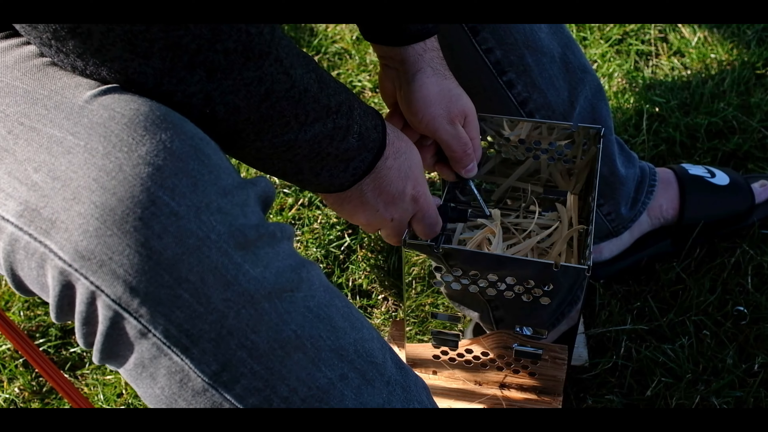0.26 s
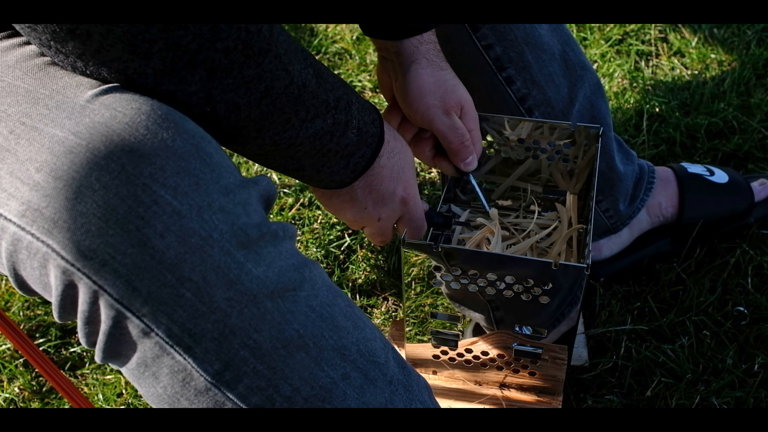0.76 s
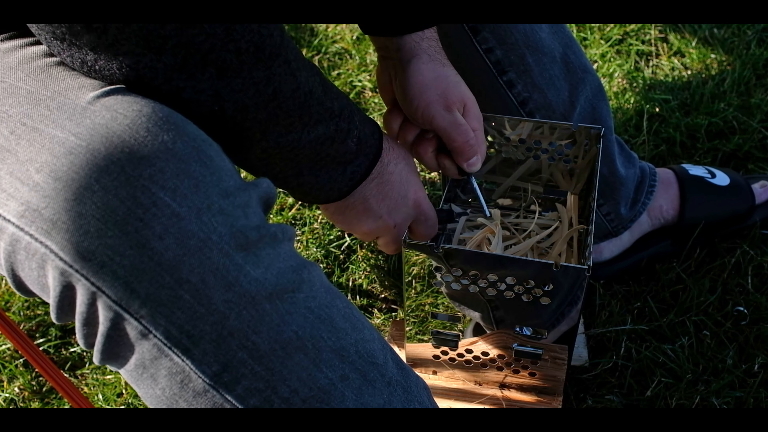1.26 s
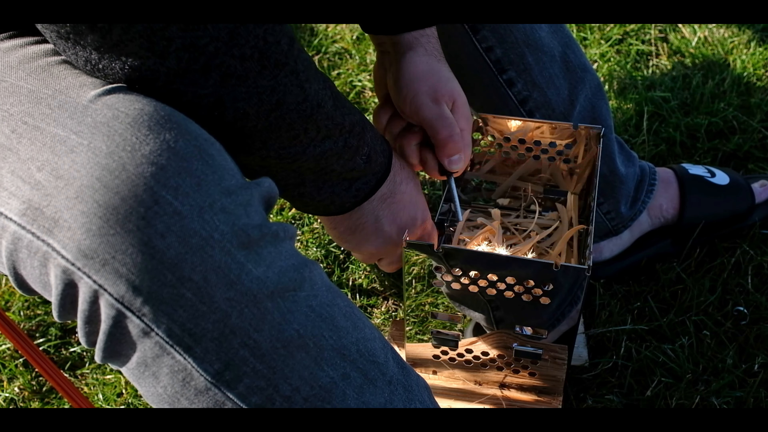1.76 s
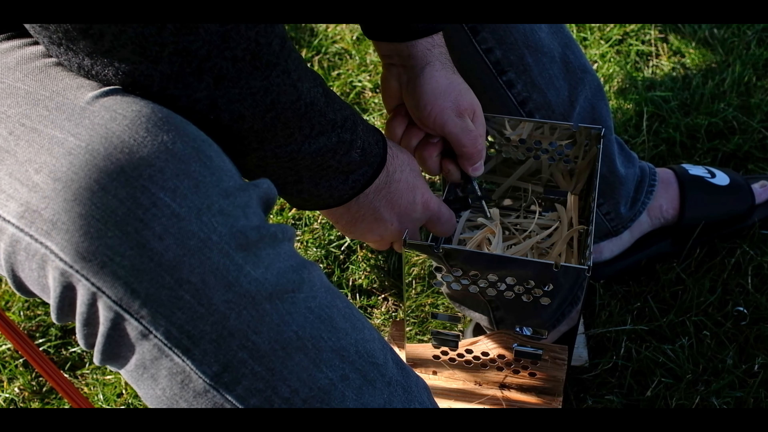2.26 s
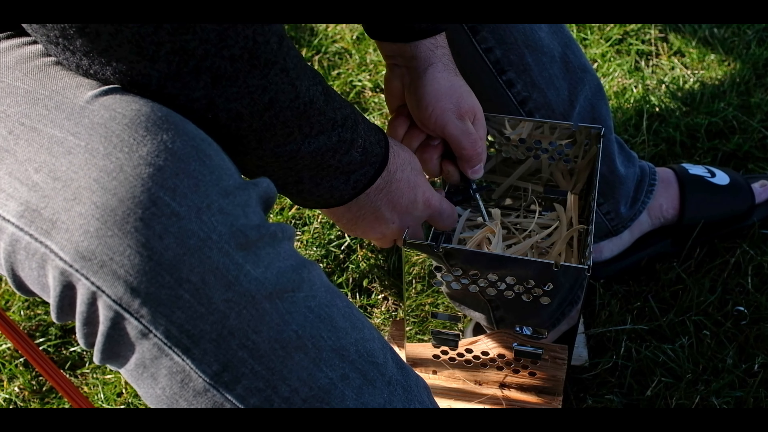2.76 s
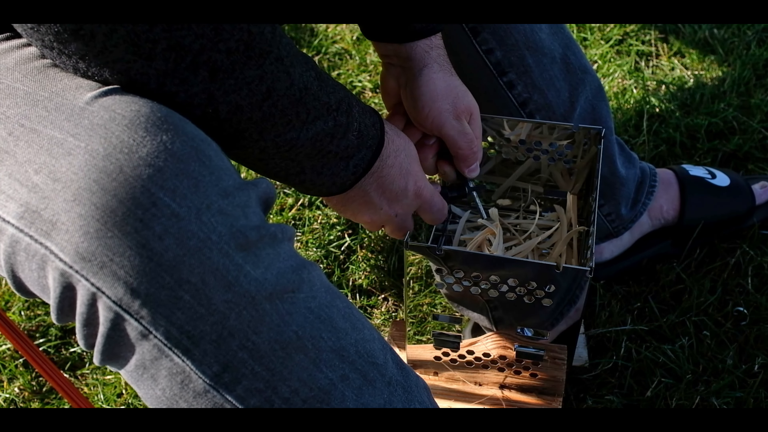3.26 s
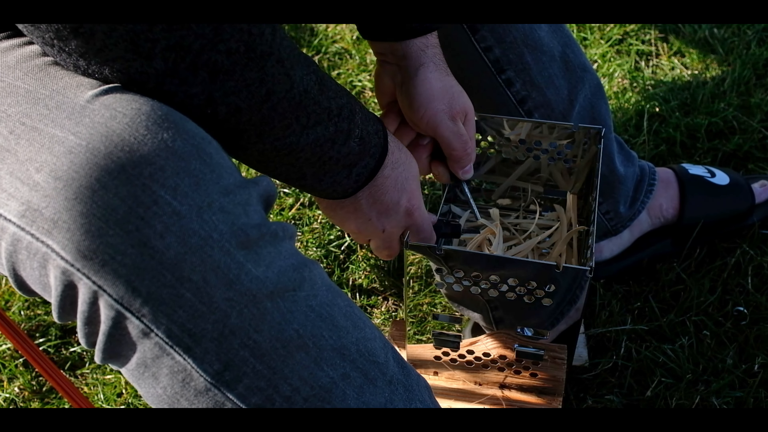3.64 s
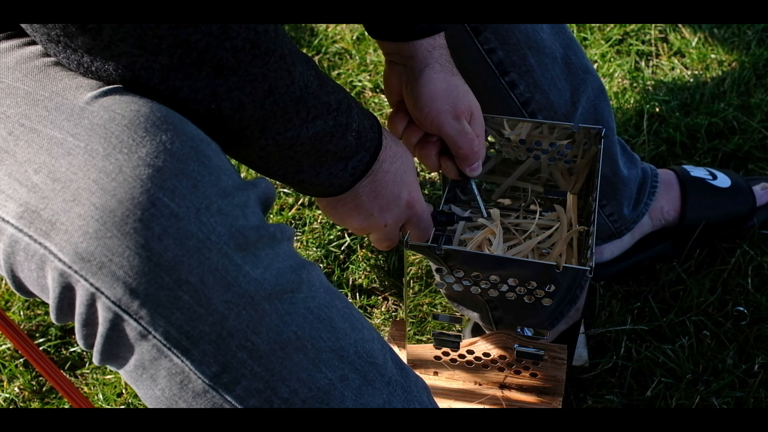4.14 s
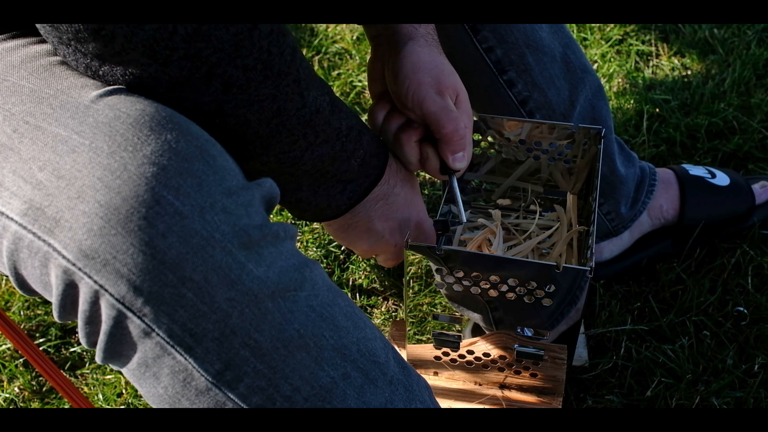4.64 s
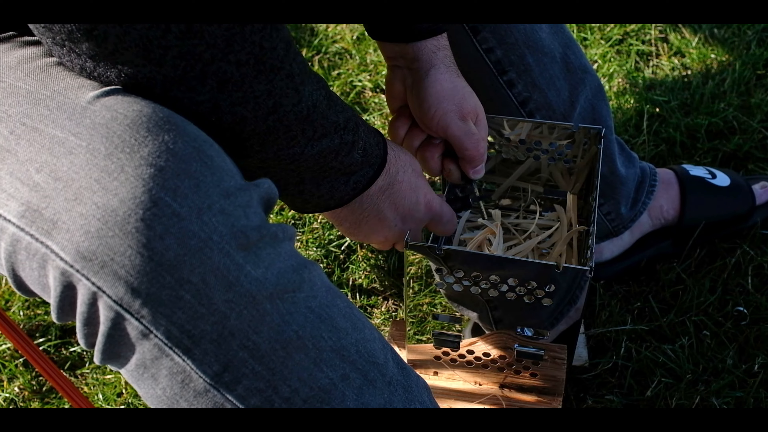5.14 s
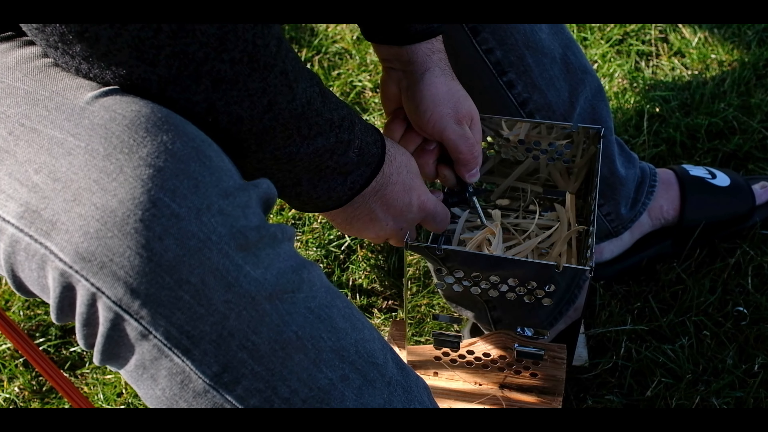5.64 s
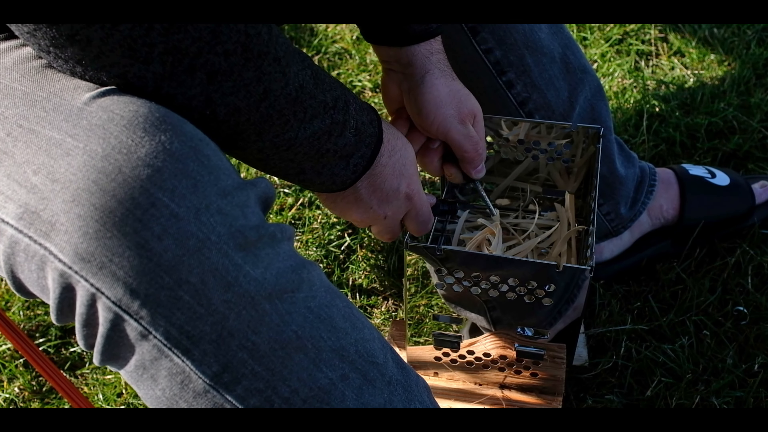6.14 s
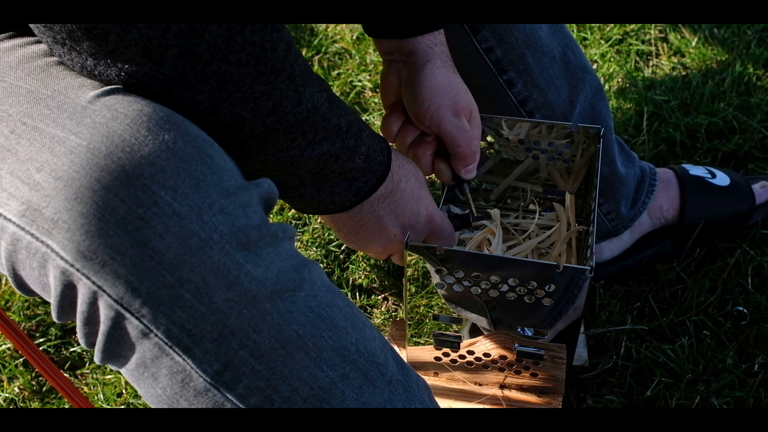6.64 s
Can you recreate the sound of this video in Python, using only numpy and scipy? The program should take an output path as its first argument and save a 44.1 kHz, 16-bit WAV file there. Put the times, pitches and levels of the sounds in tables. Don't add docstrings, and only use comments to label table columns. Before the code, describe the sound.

A steel striker rasps down a fire-steel rod in a dozen sharp, sizzling strokes with metallic ticks between, over booming wind buffeting a bare microphone.

```python
import sys
import numpy as np
from scipy import signal
from scipy.fft import rfft, irfft, next_fast_len
from scipy.io import wavfile
from scipy.ndimage import uniform_filter1d

SR = 44100
rng = np.random.default_rng(int(sys.argv[2]) if len(sys.argv) > 2 else 0)


def master_out(mix):
    frames = np.transpose(np.atleast_2d(mix))
    ceiling = np.clip(frames, -1, 1)
    pcm = np.round(ceiling * 32767).astype(np.int16)
    wavfile.write(sys.argv[1], SR, pcm)


def invert_db(x):
    u = np.asarray(x, float) / 20
    return 10 ** u


N = 304290
SCENE_CHANGE_S = 6.752


def unit(x):
    return x / np.sqrt(np.mean(x ** 2))


def curve(table, outside=-120.):
    s, *columns = np.transpose(table)
    t = np.arange(N) / SR
    return np.array([np.interp(t, s, column, outside, outside) for column in columns])


def walk(rate):
    hold = int(SR / rate)
    steps = np.repeat(rng.standard_normal(N // hold + 1), hold)
    return unit(uniform_filter1d(uniform_filter1d(steps, hold), hold)[:N])


def resonate(x, modes, shift_db=0., rate=60):
    filters = []
    for k, (hz, width, db) in enumerate(modes):
        gain = invert_db(db) * (-1) ** k
        filters.append((gain, signal.iirpeak(hz, hz / width, SR)))
    impulse = signal.unit_impulse(4096)
    norm = np.linalg.norm(sum(g * signal.lfilter(*f, impulse) for g, f in filters))
    return sum(g * signal.lfilter(*f, x * invert_db(shift_db * walk(rate))) for g, f in filters) / norm


def coloured(spectrum, flicker_db, rate):
    hz, db = np.transpose(spectrum)
    size = next_fast_len(N)
    place = np.log2(np.maximum(np.arange(size // 2 + 1) * SR / size, 1))
    tone = rfft(rng.standard_normal(size)) * invert_db(np.interp(place, np.log2(hz), db))
    total = 0
    for octave in range(16):
        band = irfft(tone * np.maximum(1 - abs(place - octave), 0), size)[:N]
        total = total + invert_db(flicker_db * walk(rate)) * band
    return unit(total)


def grit(per_s, spread_db, hiss, patchy_db, rate):
    signs = (rng.random(N) < per_s / SR) * rng.choice([-1, 1], N)
    clicks = signs * invert_db(spread_db * np.minimum(rng.exponential(size=N), 4))
    return unit((unit(clicks) + hiss * rng.standard_normal(N)) * invert_db(patchy_db * walk(rate)))


# f/Hz, level/dB per Hz
BUFFET_SPECTRUM = [(2.4, -38.5), (4.0, 2), (16, 2.5), (30, 2.5), (63, -15.5), (101, -24.5), (123, -52.5),
                   (160, -41), (210, -53.5), (350, -120)]
# t/s, pressure/full scale, length/s
OVERLOAD_SLAMS = [
    (0.15, -1.08, 0.022),
    (0.353, 1.12, 0.019),
    (0.5845, -1.194, 0.02),
    (2.13, 1.04, 0.023),
]


def buffets(gust_db):
    eddies = coloured(BUFFET_SPECTRUM, flicker_db=0.0, rate=2)
    eddies /= uniform_filter1d(eddies ** 2, int(.07 * SR)) ** .28
    level_db = 11.5 + 0.97 * gust_db + 1.8 * walk(7)
    pressure = .95 * np.tanh(invert_db(level_db) * unit(eddies) / .95)
    t = np.arange(N) / SR
    for s, peak, length in OVERLOAD_SLAMS:
        near = np.exp(-((t - s) / length) ** 2 * 2)
        pressure += near * (peak * np.cos(np.pi * (t - s) / length) - pressure)
    return pressure


# f/Hz, level/dB per Hz
RUSH_SPECTRUM = [(41, -21.5), (70, -8.5), (209, -21), (391, -27.5), (428, -30), (613, -36.5), (989, -42),
                 (2500, -64), (3250, -96), (5500, -120)]


def rush(gust_db):
    far = np.arange(N) / SR > SCENE_CHANGE_S
    level_db = -17.5 + 0.7 * gust_db - 15 * far
    return invert_db(level_db) * coloured(RUSH_SPECTRUM, flicker_db=1.0, rate=12)


# t/s, f/Hz, level/dB
WHISTLE_PATH = [(0, 948, -82), (1.3, 780, -86), (1.8, 950, -56.5), (1.95, 1004, -54.5), (2.1, 900, -54.5),
                (2.3, 900, -65), (2.7, 809, -58), (3.2, 785, -61), (5.8, 902, -79.5), (6.2, 1051, -58.5),
                (6.5, 982, -57.5), (6.75, 917, -54), (6.9, 943, -67.5)]


def whistle():
    hz, db = curve(WHISTLE_PATH)
    wobble = signal.lfilter(*signal.butter(2, 38, fs=SR), rng.standard_normal((2, N)))
    phase = 2 * np.pi * np.cumsum(hz * (1 + .065 * walk(16))) / SR
    return invert_db(db) * unit(wobble[0] * np.cos(phase) + wobble[1] * np.sin(phase))


def grass():
    hiss = resonate(rng.standard_normal(N), [(6250, 420, 0)])
    return invert_db(-78.5 + 3.0 * walk(4.6)) * hiss


# f/Hz, level/dB per Hz
AIR_SPECTRUM = [(880, -16.5), (1500, -6), (1610, -10.5), (1870, -8.5), (1920, -12.5), (5600, -21),
                (6310, -20.5), (7760, -24), (15100, -33), (16000, -38.5)]


def air():
    return invert_db(-61) * coloured(AIR_SPECTRUM, flicker_db=3.1, rate=16)


# t/s, level/dB
GUSTS = [(0, -17.5), (.35, -20.5), (.62, -23.5), (1.0, -29.5), (1.3, -27), (1.7, -27), (2.1, -23),
         (2.5, -26.5), (2.75, -26.5), (3.3, -27), (3.6, -30.5), (4.4, -31), (5.0, -35.5), (5.7, -33),
         (6.15, -24), (6.45, -22.5), (6.75, -28), (6.9, -33)]


def wind():
    gust_db, = curve(GUSTS, outside=-30.0)
    return buffets(gust_db) + rush(gust_db) + whistle() + grass() + air()


# t/s, length/s, first chatter level/dB, last chatter level/dB, rise of sizzle level/dB
SKATES = [(0, 0.015, -68, -27.5, 10), (0.546, .069, -43, -30, 11), (1.144, .05, -46.5, -30.5, 12.5),
          (1.722, .054, -50, -28.5, 10.5), (2.278, 0.034, -34.5, -39.5, 4), (2.826, .037, -41, -29.5, 12),
          (3.399, .048, -49, -28.5, 16), (3.995, 0.035, -33.5, -37.5, 6), (4.558, 0.066, -48, -30, 11),
          (5.158, 0.043, -50.5, -36, 17), (5.749, 0.056, -53, -31.5, 7.5), (6.035, .018, -59, -37.5, -2),
          (6.573, .11, -53, -47.5, 13)]
# t/s, hold/s, sizzle level/dB, 30 dB fade/s, box minus sizzle level/dB
SHAVING_CUTS = [(.014, 0.0021, -31, 0.0427, -7.5), (.617, 0.01, -23, 0.0917, -1.5),
                (1.193, 0.01, -29, 0.0776, -6), (1.773, .03, -31.5, 0.0811, -6),
                (2.305, 0.016, -27, 0.0479, -10), (2.865, 0.056, -21.5, 0.0765, -2.5),
                (3.447, 0.028, -28, 0.0415, -7.5), (4.03, .03, -28, 0.0505, -10),
                (4.622, 0.028, -30.5, 0.0252, -6.5), (5.203, 0.013, -29.5, 0.0614, -6),
                (5.228, 0.043, -24.5, 0.0725, -1.5), (5.803, 0.044, -30.5, 0.0547, -2.5),
                (6.684, 0.01, -46, 0.1, -9)]
# t/s, hold/s, level/dB, 30 dB fade/s, box minus drag
# level/dB
DULL_DRAGS = [(.04, 0.11, -57, .05, -4), (.733, 0.033, -30, 0.082, 0.5), (1.375, .03, -56, 0.19, -6),
              (1.845, 0.019, -41, 0.028, -13), (2.36, 0.08, -54.5, 0.23, -2), (3.54, 0.07, -61, 0.032, 8),
              (3.6, .05, -63.5, 0.017, 13.5), (4.922, 0.053, -53.5, 0.024, 9),
              (5.855, 0.026, -31.5, 0.07, -1)]


def contact():
    levels, t = np.zeros((3, N)), np.arange(N) / SR
    for s, length, from_db, to_db, bite_db in SKATES:
        on = slice(int(s * SR), int((s + length) * SR))
        progress = np.clip((t[on] - s) / length, 0, 1)
        rod_db = from_db + (to_db - from_db) * progress
        sizzle_db = rod_db - 8 + bite_db * progress ** 3.3
        levels[:, on] += invert_db([sizzle_db, rod_db, rod_db - 10])
    # strokes, chatter dB, chatter sag dB/s, rise s
    for strokes, chatter_db, chatter_sag, rise in [(SHAVING_CUTS, -11.5, 119, 0.0027),
                                                   (DULL_DRAGS, -28, 0, 0.018)]:
        for s, hold, peak_db, fade, box_db in strokes:
            on = slice(int(s * SR), int((s + hold + 2 * fade) * SR))
            age = np.maximum(t[on] - s, 0)
            fade_db = 30 * (np.maximum(age - hold, 0) / fade) ** 1.34
            db = peak_db - 118 * np.minimum(age, hold) - fade_db
            rod_db = chatter_db - box_db - chatter_sag * age
            colour_db = [0 * age, rod_db, box_db + 37.5 * age]
            levels[:, on] += np.minimum(age / rise, 1) * invert_db(db + colour_db)
    return levels


# t/s, peak level/dB
CATCH_HITS = [(.0074, -20), (.169, -47), (.4489, -36.5), (.5895, -13.5), (1.193, -17), (1.773, -15),
              (1.8286, -14), (1.8881, -32), (2.3121, -19), (2.8654, -9.5), (2.893, -15), (2.965, -28),
              (3.4253, -38), (3.4475, -15), (4.03, -15), (4.615, -24), (5.2287, -15), (5.764, -32),
              (5.8016, -16), (5.8641, -26), (6.6837, -12.5), (6.6996, -28)]
# t/s, peak level/dB
FLAT_KNOCKS = [(.0978, -29.5), (.5087, -41), (.9382, -25), (1.9015, -45), (2.2114, -43), (2.541, -43),
               (2.6303, -22.5), (3.2414, -28.5), (3.7335, -49), (3.8867, -57), (4.119, -34), (4.3056, -55),
               (4.3874, -29), (4.515, -39.5), (4.9733, -29), (5.554, -22.5), (6.2262, -35.5),
               (6.2934, -26.5)]
# t/s, peak level/dB
SKIP_CHIRPS = [(.3662, -37), (.381, -24.5), (.4664, -41), (.5512, -35), (.5637, -41), (1.1448, -31),
               (1.1554, -29), (1.1772, -38), (1.322, -46), (1.3287, -38), (1.338, -40), (1.7424, -37),
               (2.8161, -30), (2.828, -22.5), (3.404, -38), (4.0036, -41), (4.548, -40.5), (4.558, -44),
               (4.568, -44), (5.7541, -38), (5.777, -23.5), (6.001, -28.5), (6.0434, -27), (6.585, -35),
               (6.61, -31), (6.63, -42), (6.668, -32), (6.8797, -27)]
# t/s, peak level/dB, rod chatter minus peak level/dB
EDGE_TICKS = [(.4773, -38, -3), (.5177, -41, 3), (.617, -16, -4), (.9792, -29.5, -5), (1.5578, -32, -10),
              (1.5627, -25.5, 9.5), (2.1332, -25.5, 1), (2.174, -35.5, 1), (2.282, -32, 1),
              (2.3055, -19, -6), (2.6575, -19.5, -5), (2.7804, -43, -3), (2.803, -35, 6),
              (3.271, -18, -0.5), (3.3897, -48, -1), (3.799, -16.5, 1), (3.997, -32, 5),
              (4.4205, -22.5, 2.5), (5.0001, -24.5, 3), (5.1164, -47, -2), (5.2013, -19, -3.5),
              (5.222, -22, 2), (5.5774, -26.5, 1.5), (6.3122, -33, 14), (6.321, -24.5, 8),
              (6.6508, -30.5, -1)]
# t/s, peak level/dB
BOX_BUMPS = [
    (3.9549, -40.5),
    (5.1647, -41),
    (5.785, -38.5),
    (6.2, -51),
]


def touches():
    # rod, box re peak dB; the ticks bring their own rod level
    kinds = [(FLAT_KNOCKS, (-23, 0)), (EDGE_TICKS, (-4.1,)), (SKIP_CHIRPS, (-1.5, -21)),
             (CATCH_HITS, (-10.5, -10.5)), (BOX_BUMPS, (-21, 8.6))]
    return [(*row, *colour) for rows, colour in kinds for row in rows]


def ticks(t60, bounce_s, bounce_db, tail_db, tail_t60):
    out, t = np.zeros((3, N + 2048)), np.arange(2048) / SR
    for s, db, rod_db, box_db in touches():
        late, size = rng.standard_normal(2)
        noise = rng.standard_normal(2048)
        after = t - bounce_s * (1 + 0.15 * late)
        rebound = (after > 0) * 1000. ** (-np.maximum(after, 0) / t60)
        first = 1000. ** (-t / t60)
        tail = invert_db(tail_db) * 1000. ** (-t / tail_t60)
        i = int(s * SR)
        for row, (own_db, again_db) in enumerate([(0, 0), (rod_db, -7), (box_db, 4)]):
            shape = first + invert_db(bounce_db + again_db + 3 * size) * rebound + tail
            out[row, i:i + 2048] += invert_db(db + own_db) * shape * noise
    return out[:, :N]


# t/s, f/Hz, level/dB, rise/s, t60/s
STEEL_RINGS = [(.615, 5800, -26, .004, .04), (.62, 1480, -30, .01, .1), (1.174, 12200, -22, .002, .025),
               (1.741, 12400, -26, .004, .05), (2.803, 12400, -32, .002, .03),
               (2.828, 12400, -20, .003, .03), (2.865, 3400, -28, .006, .08), (2.875, 1480, -24, .012, .15),
               (2.905, 8270, -24, .006, .04), (2.92, 6621, -53, .02, .39), (3.998, 12400, -24, .002, .03),
               (5.23, 1089, -24, .01, .14), (5.24, 1480, -30, .01, .12), (5.775, 7800, -24, .003, .03),
               (5.785, 12500, -26, .004, .04), (5.825, 1500, -32, .008, .08), (5.86, 1400, -30, .01, .12),
               (6.228, 4800, -58, .004, .12), (2.92, 1535, -38, .015, .33), (2.9, 3048, -51, .02, 1.2),
               (2.93, 3714, -46, .015, .35), (2.93, 3480, -47, .015, .3), (5.26, 3330, -38, .01, .24),
               (5.87, 3042, -55, .03, 1.1)]


def rings():
    out, t = np.zeros(N + SR), np.arange(SR) / SR
    shake = walk(150)
    for s, hz, db, rise, t60 in STEEL_RINGS:
        i = int(s * SR)
        blur_hz = 45 * np.exp(-t / .06) * np.roll(shake, -i)[:SR]
        swell = (1 - np.exp(-t / rise)) ** 2 * 1000. ** (-t / t60)
        out[i:i + SR] += invert_db(db) * swell * np.sin(2 * np.pi * np.cumsum(hz + blur_hz) / SR)
    return out[:N] * invert_db(1.2 * walk(70))


def scattered(near):
    t = np.arange(SR // 4) / SR
    noise = signal.lfilter(*signal.butter(2, 5500, fs=SR), rng.standard_normal(len(t)))
    scatter = noise * 1000. ** (-t / 0.097)
    return invert_db(-22.5) * signal.fftconvolve(near, scatter / np.linalg.norm(scatter))[:N]


# f/Hz, width/Hz, level/dB
SHAVING_MODES = [(2850, 1430, 1), (3630, 950, 5.5), (4730, 1120, 1.5), (5645, 600, 8.5), (6530, 3940, -0.5)]
ROD_MODES = [(10300, 1500, -13), (12270, 530, -2), (13460, 1670, 1.5), (13500, 3600, -4)]
BLADE_MODES = [(7860, 920, -8.5), (8700, 1090, 4.5), (9500, 770, -7.5)]
BOX_MODES = [(655, 390, -6.5), (1110, 63, 1), (1330, 216, -3.5), (1540, 270, -0.5), (1990, 1200, -10)]
TAP_MODES = [(1170, 270, -9), (2026, 260, -1.5)]


def striker():
    levels = contact()
    bite = grit(per_s=1400, spread_db=6, hiss=2.4, patchy_db=1.9, rate=150)
    squeal = grit(per_s=5800, spread_db=7.5, hiss=1.5, patchy_db=3.5, rate=200)
    judder = grit(per_s=800, spread_db=3.5, hiss=0.94, patchy_db=2.5, rate=90)
    for s, *_ in touches():
        i = int(s * SR)
        levels[:, i - 200:i] *= invert_db(np.linspace(0, -6, 200))
    scrape = levels * [bite, squeal, judder]
    touch = invert_db(-9.5) * ticks(t60=0.0057, bounce_s=.003, bounce_db=-6, tail_db=-15.0, tail_t60=0.041)
    shavings, rod = scrape[:2] + touch[:2]
    blade = invert_db(-7.5) * shavings + invert_db(-5.5) * rod
    near = resonate(shavings, SHAVING_MODES, shift_db=1.0, rate=110)
    near += resonate(rod, ROD_MODES, shift_db=2.0, rate=98)
    near += resonate(blade, BLADE_MODES, shift_db=3.0, rate=100)
    near += resonate(scrape[2], BOX_MODES, shift_db=1.5, rate=60)
    near += resonate(touch[2], TAP_MODES)
    return near + rings() + scattered(near)


# f/Hz, level/dB per Hz
FAR_SPECTRUM = [(60, -20), (120, 7), (350, -4), (1000, -7), (2500, -17), (4200, -19.5), (4900, -30),
                (8000, -38), (11000, -37)]


def far_microphone():
    t = np.arange(N) / SR - SCENE_CHANGE_S
    thump = invert_db(-15) * np.sin(2 * np.pi * 120 * t) * np.exp(-(t / 0.0023) ** 2)
    hiss = invert_db(-39.5) * coloured(FAR_SPECTRUM, flicker_db=3.0, rate=11)
    return np.clip(t / 0.0014, 0, 1) * hiss + thump


def scene():
    return (wind() + striker() + far_microphone())[None]


def band_limit(x):
    return signal.sosfilt(signal.butter(12, 16430, fs=SR, output="sos"), x)


def record(dry):
    low_pass = signal.ellip(8, .2, 60, 16100, fs=SR, output="sos")
    mix = signal.sosfilt(low_pass, np.clip(dry, -1, 1))
    return band_limit(mix)


dry = scene()
out = record(dry)
master_out(out)
```